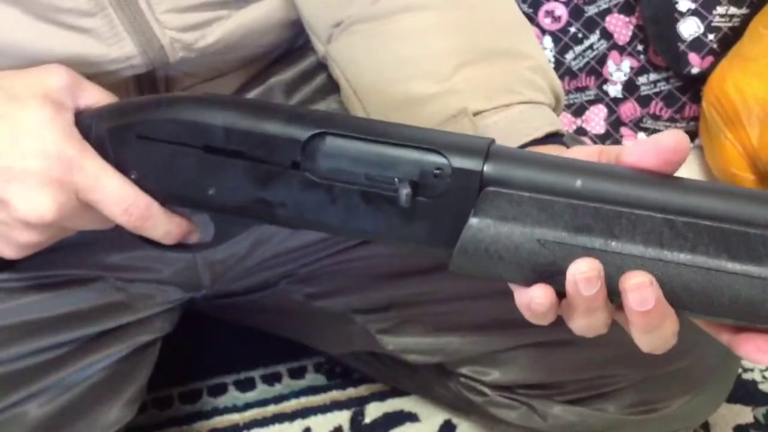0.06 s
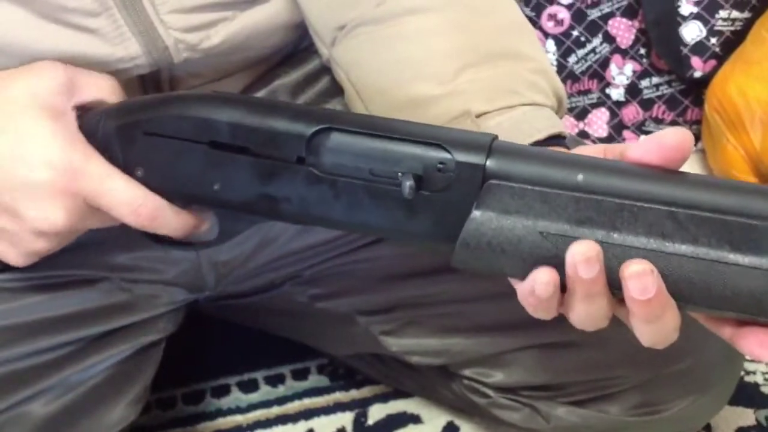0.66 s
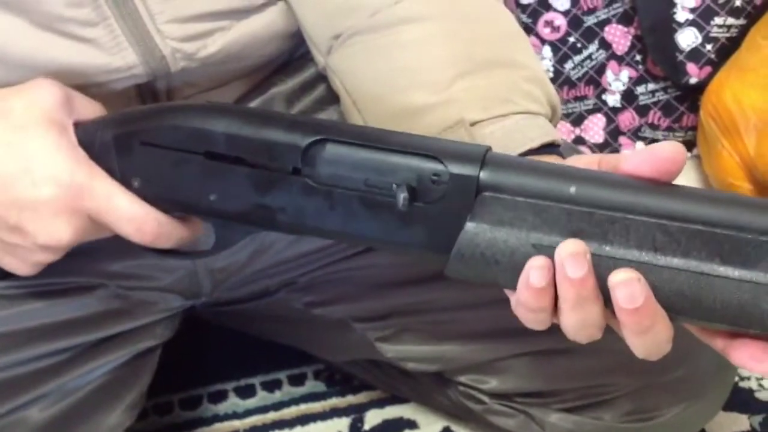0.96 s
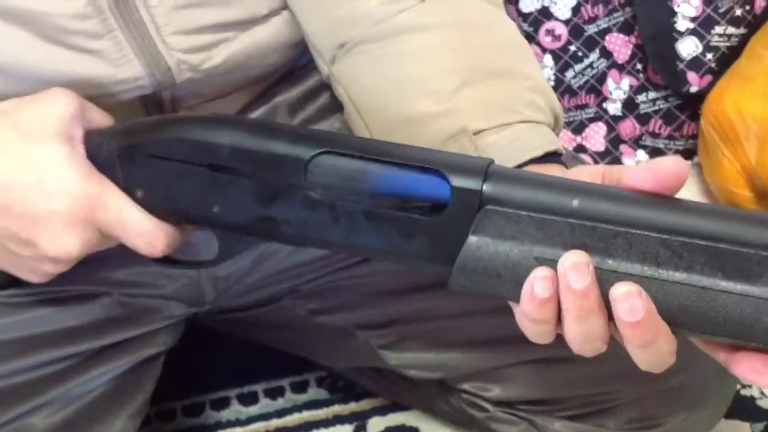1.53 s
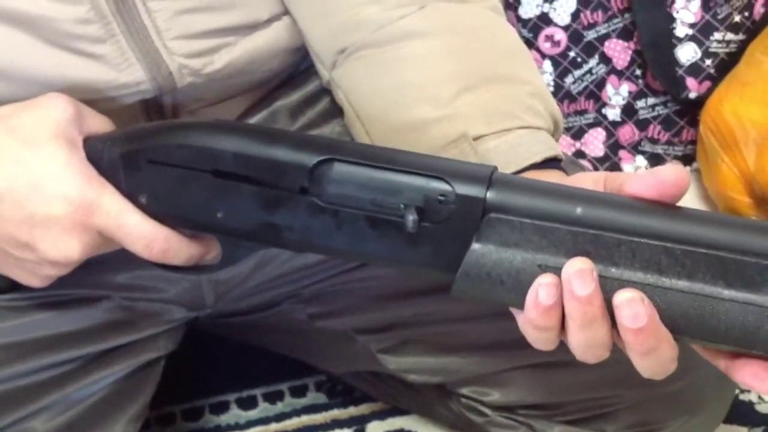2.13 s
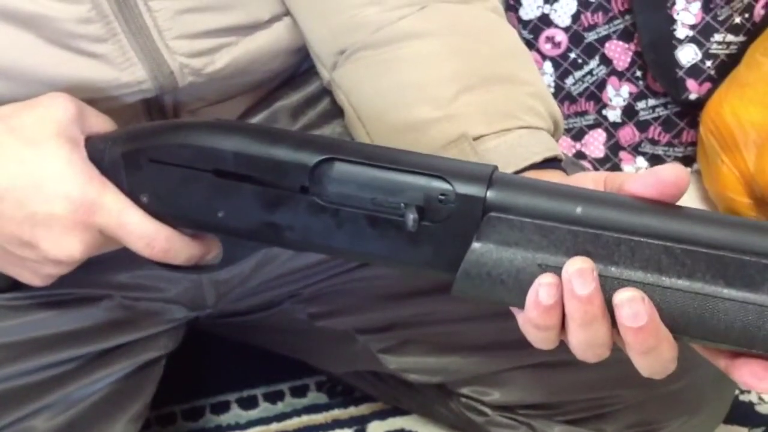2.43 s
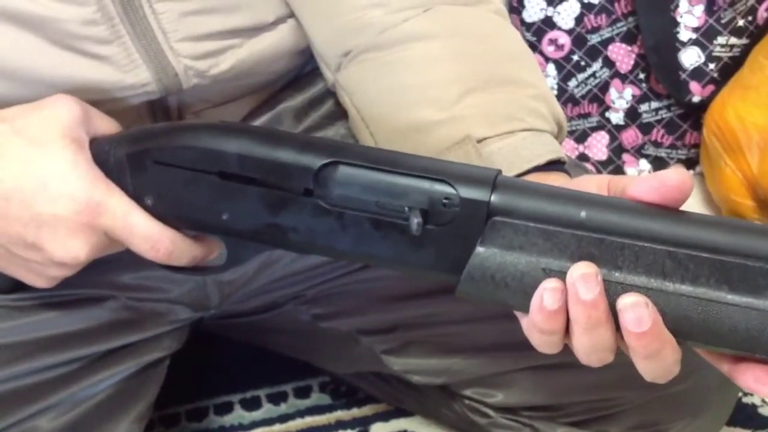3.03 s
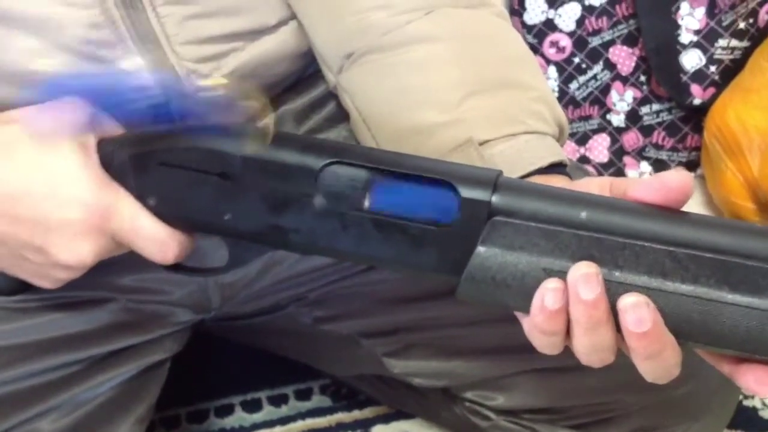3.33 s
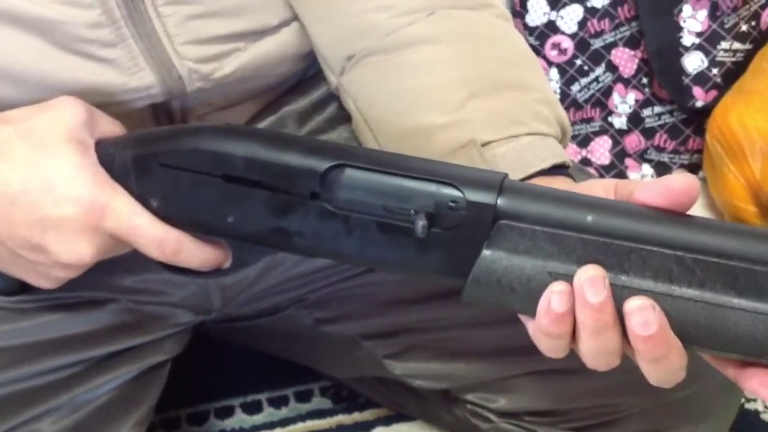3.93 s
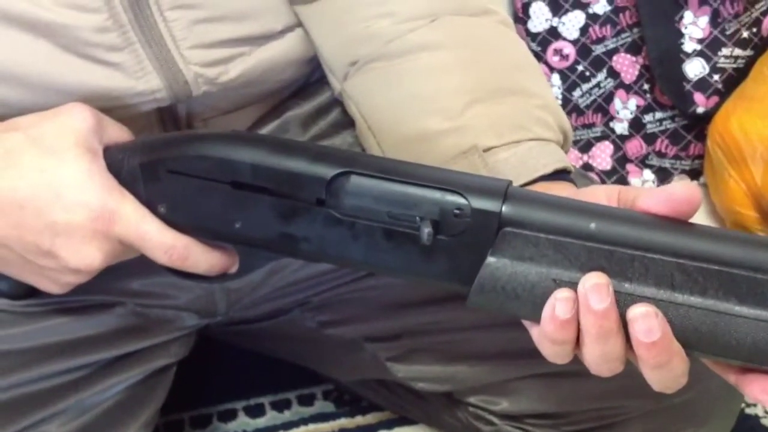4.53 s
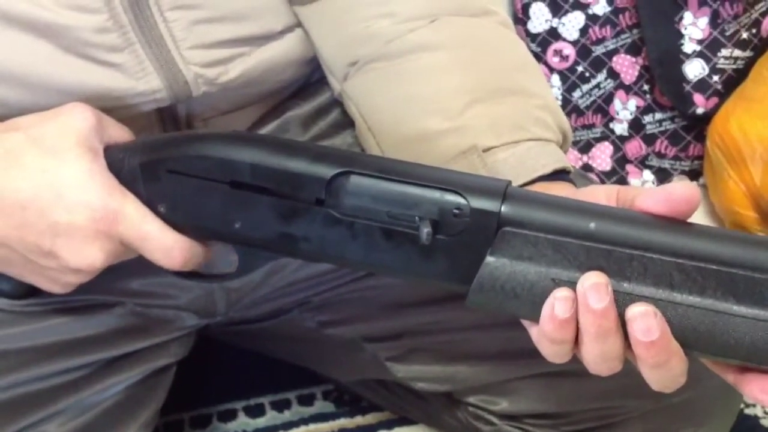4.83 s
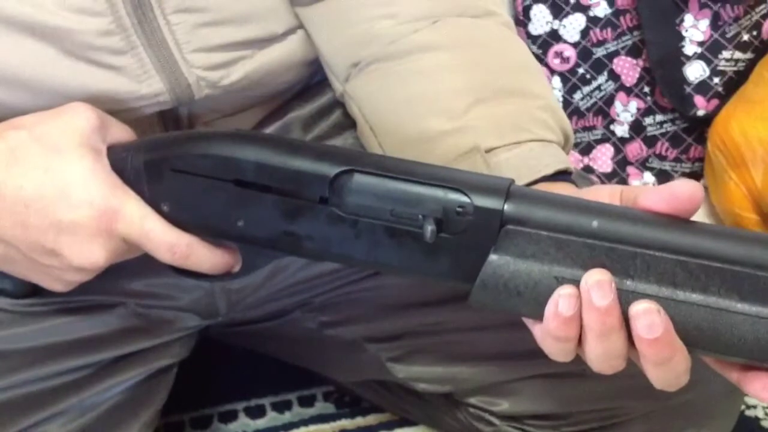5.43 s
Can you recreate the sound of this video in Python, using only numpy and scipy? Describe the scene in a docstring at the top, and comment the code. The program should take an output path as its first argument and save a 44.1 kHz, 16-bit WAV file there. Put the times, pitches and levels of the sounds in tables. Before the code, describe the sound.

A gas-powered toy shotgun fires three sharp, clacking shots indoors, with ejected plastic shells clattering and clinking in between.

```python
"""A faint rush and hiss in a small, live room, then hands shifting on a stock close to the microphone.
A gas-powered toy shotgun fires three times: hammer snap, gas blast and the clack of the cycling bolt,
loud enough to overload the input. Further off, two ejected plastic shells with brass bases clatter
about, the first also rolling and clinking on metal. A spring sings in the gun after the second shot,
and the third shell drops on something soft."""
import sys
import numpy as np
from scipy import signal
from scipy.fft import rfft, irfft, next_fast_len
from scipy.io import wavfile

SR = 44100
rng = np.random.default_rng(int(sys.argv[2]) if len(sys.argv) > 2 else 0)


def wav_out(sig):
    """Save sig, one row per channel (or a flat mono array), as 16-bit PCM at SR to the path in sys.argv[1]."""
    wavfile.write(sys.argv[1], SR, np.round(np.clip(np.atleast_2d(sig).T, -1, 1) * 32767).astype(np.int16))


N = 250047
AGE = np.arange(SR // 2) / SR  # seconds since a blow

# The hammer falls. Each row: start in seconds, blast trim in dB, cycle length relative to normal,
# bolt trim in dB, trim of the bolt's low thud in dB.
SHOTS = [(1.446, 0, 1.0, 0, -11.5), (3.2605, 0.5, 0.97, 0, 11), (4.8845, 0.5, 0.97, 0, -5.5)]
# The sharp (snap) and dull (body) colours of a blow on the gun, its metal action or a shell.
# Each row: frequency in Hz, relative spectral level in dB.
GUN_SNAP = [(100, -46.5), (1000, -21), (2200, -18), (3500, -16.5), (4700, -5.5), (5700, 1), (6900, -7),
            (8500, -3.5), (10500, -15.5), (12500, -22.5), (15000, -36)]
CLACK_BODY = [(40, -40), (100, -25), (300, -11), (900, -6), (1400, -7), (2200, 1), (3800, 1), (6000, -10),
              (15000, -42)]
SHELL_SNAP = [(100, -50.5), (1000, -26), (2200, -18), (3600, -13), (4700, -5), (5700, 2), (7000, -7),
              (8500, -7), (10500, -16.5), (12500, -24), (15000, -36)]
SHELL_BODY = [(40, -38.5), (90, -23), (170, 0), (300, -1), (430, 2), (700, -2), (1000, -3.5), (1400, -3.5),
              (2000, -2.5), (2800, -8), (4000, -14), (6000, -30), (15000, -47)]


def amp(db):
    """Decibels to gain."""
    return 10 ** (np.asarray(db) / 20)


def unit(x):
    """Scale to rms 1."""
    return x / np.sqrt(np.mean(x ** 2) + 1e-20)


def along(points, hz):
    """Read (Hz, value) points on a log frequency axis."""
    freqs, values = np.transpose(points)
    return np.interp(np.log(hz + 1), np.log(freqs + 1), values)


def fade(t60, t=AGE):
    """Exponential decay, 60 dB down after t60 seconds."""
    return np.exp(-np.log(1000) * t / np.maximum(t60, 1e-4))


def add(track, s, sound):
    """Mix a sound into the track at s seconds."""
    part = track[max(round(s * SR), 0):][:len(sound)]
    part += sound[:len(part)]


def coloured(x, spectrum):
    """Give x a spectrum through a causal filter of unit power gain."""
    size = 2 * next_fast_len(len(x))
    gain = unit(amp(along(spectrum, np.fft.rfftfreq(size, 1 / SR))))
    cepstrum = irfft(np.log(gain + 1e-6))
    cepstrum[1:size // 2] *= 2  # minimum phase: nothing sounds ahead of the blow
    cepstrum[size // 2 + 1:] = 0
    return irfft(rfft(x, size) * np.exp(rfft(cepstrum)))[:len(x)]


def burst(spectrum, rise, t60):
    """A short rattle of pressure in a given colour; rise and t60 are in seconds."""
    attack = 1 - np.exp(-AGE / max(rise, 1e-5))
    return coloured(rng.standard_normal(len(AGE)) * attack * fade(t60), spectrum)


def ring(modes, scatter_db):
    """Decaying modes, struck at new strengths by every blow."""
    return sum(amp(db + scatter_db * rng.standard_normal()) * np.sin(2 * np.pi * hz * AGE) * fade(t60)
               for hz, db, t60 in modes)


def in_room(x, wet_db, build):
    """The direct sound and the room's echoes, which swell over build seconds and die by band."""
    # The room's decay. Each row: frequency in Hz, t60 in seconds.
    room = [(100, 0.18), (400, 0.23), (2000, 0.25), (6000, 0.24), (10000, 0.23), (15000, 0.18)]
    hz, t, bands = signal.stft(rng.standard_normal(len(AGE)), SR, nperseg=256)
    bands = bands * fade(along(room, hz)[:, None], t)
    tail = signal.istft(bands, SR, nperseg=256)[1][:len(AGE)]
    tail *= 1 - np.exp(-(AGE / build) ** 2)
    return x + amp(wet_db) * signal.fftconvolve(x, tail / np.linalg.norm(tail))[:len(x)]


def room_tone(dip_db=11, recovery_s=0.91):
    """A low rush and a thin hiss drift in level; both dip at each shot and creep back."""
    # Drift in the two long pauses. Each row: time in seconds, relative rush and hiss levels in dB.
    drift = [
        [(0.0, -72.5, -71), (0.922, -72.5, -61.5), (1.37, -71.5, -62.5)],
        [(4.15, -59.5, -65), (4.34, -58.5, -66), (4.84, -55, -61)],
    ]
    # Colours of rush and hiss. Each row: frequency in Hz, relative spectral level in dB.
    rush = [(25, -42.5), (60, -30.5), (100, -14.5), (135, -9.5), (175, 3.5), (270, -6), (430, 3),
            (650, -5.5), (950, -9.5), (1500, -20.5), (3000, -26), (8000, -59)]
    hiss = [(40, -26), (110, -1.5), (230, 5.5), (450, -6), (800, -2), (1600, -7), (4000, -6), (5600, 1),
            (8400, -7), (11000, -11.5), (15000, -18.5)]
    t = np.arange(N) / SR
    times, rush_db, hiss_db = np.vstack(drift).T
    dip = dip_db * sum(np.interp(t, [s, s + recovery_s], [1, 0], left=0) for s, *_ in SHOTS)
    return sum(amp(np.interp(t, times, db) - dip) * unit(coloured(rng.standard_normal(N), spectrum))
               for db, spectrum in [(rush_db + 0.5, rush), (hiss_db + 2.5, hiss)])


def grip():
    """Hands and sleeves tick and scuff faintly on the gun ahead of the first shot."""
    # Each row: start in seconds, relative level in dB, body against snap in dB, rise and t60 in seconds.
    touches = [(0.6623, -26.5, -12, .0005, 0.011), (0.6835, -33, -6, .0005, 0.011),
               (0.7338, -34, -12, .0005, 0.012), (1.106, -40, -28, .03, 0.32), (1.382, -45, 1, 0.011, 0.19)]
    out = np.zeros(N)
    for s, db, body_db, rise, t60 in touches:
        scuff = burst(GUN_SNAP, rise, t60) + amp(body_db) * burst(CLACK_BODY, rise, t60)
        add(out, s, amp(db - 7.5) * in_room(scuff, wet_db=0, build=0.006))
    return out


def push(width_s):
    """One low swing of pressure as gas or a heavy part moves."""
    u = AGE / width_s
    return -u * (2 - u) * np.exp(-u) * 2


def shots(push_delay_s=0.004, body_life=0.81):
    """The gun fires close to the microphone; each stage is a sharp snap, a dull body and a low push."""
    # Trigger, hammer on the valve, gas blast, bolt at its rear stop, venting. Each row: delay in
    # seconds, relative levels of the stage, its body and its push in dB, rise and t60 in seconds.
    stages = [(-.012, -30, 8, -27, .001, 0.034), (.0003, 3, -9.5, -16.5, 0.0039, 0.074),
              (0.015, 6, -4, -14, .001, 0.092), (0.0497, 6, -20, -17, .002, .026),
              (.064, -3.5, -25.5, -40.5, 0.0032, .08)]
    # The dull part of a shot. Each row: frequency in Hz, relative spectral level in dB.
    gun_body = [(25, -7.5), (70, -11.5), (120, -2), (180, 2), (290, 0), (450, 2), (700, -7), (1050, 0.5),
                (1500, -10), (2600, -1), (5000, -26.5), (15000, -44)]
    out = np.zeros(N)
    for s, db, stretch, *_ in SHOTS:
        for delay, stage_db, body_db, push_db, rise, t60 in stages:
            start, gain = s + stretch * delay, amp(db + stage_db - 4)
            snap = in_room(burst(GUN_SNAP, rise, t60), wet_db=-9.5, build=0.0075)
            # at this distance the low parts carry little of the room
            body = in_room(burst(gun_body, rise, t60 * body_life), wet_db=-15.5, build=0.0092)
            add(out, start, gain * (snap + amp(body_db - 6) * body))
            add(out, start + push_delay_s, gain * amp(push_db - 6.5) * push(width_s=0.00073))
    return out


def action():
    """Metal parts clack and ring as the bolt runs forward and chambers a shell, at that shot's pace."""
    # Bolt, shell lifter and latch. Each row: delay in seconds, relative levels of the clack,
    # its body and its push in dB.
    clacks = [(0.1011, 2.5, -32.5, -46.5), (0.1226, -3, -34, -46), (0.1336, -1.5, -18.5, -51.5),
              (0.1405, 4.5, -20.5, -46), (.156, -7, -17, -39), (.1894, -14.5, -23, -52),
              (0.2079, -4.5, -29, -64), (0.2179, -16.5, -22, -59.5)]
    # Modes of the steel parts. Each row: frequency in Hz, relative level in dB, t60 in seconds.
    steel = [(5400, -4, 0.2), (5453, -4, 0.2), (5647, -3, 0.19), (6083, -7, 0.22), (6504, -8, 0.22),
             (7000, -7.5, 0.22), (7900, -7, 0.22), (8200, -3, 0.18), (8500, 0, 0.18), (10640, -12.5, 0.11)]
    out = np.zeros(N)
    for s, _, stretch, bolt_db, thud_db in SHOTS:
        for delay, db, body_db, push_db in clacks:
            snap = burst(GUN_SNAP, rise=0.0013, t60=0.017)
            body = amp(body_db + 2) * burst(CLACK_BODY, rise=0.00069, t60=0.039)
            clack = in_room(snap + body, wet_db=-7, build=0.0017)
            thud = amp(push_db + thud_db + 11.5) * push(width_s=0.00054)
            ringing = amp(-42) * ring(steel, scatter_db=4.5)
            add(out, s + stretch * delay, amp(bolt_db + db - 2) * (clack + thud + ringing))
    return out


def shell_bounces(t60=0.016, hollow_db=6):
    """Plastic hulls land on one end, then the other, so far off that the echo outweighs the knock."""
    # Each row: start in seconds, relative levels of the knock and its body in dB, body pitch in Hz,
    # seconds until the other end lands, that end against the first in dB.
    landings = [(1.8886, -13.5, -7.5, 1994, .019, -8.5), (1.921, -1.5, -26, 1996, .010, -1),
                (1.9415, 3, -11, 1210, .008, -1), (2.148, -19, -17, 2000, .006, -7),
                (2.2313, -12, -29, 2200, .0045, -1), (2.2875, -12, -10.5, 1500, .006, 3.5),
                (2.3255, -10, -13.5, 410, .013, -0.5), (2.4053, -15, 4.5, 1040, .0125, -1.5),
                (2.4835, -15, -7.5, 1800, .02, -0.5), (2.5247, -14.5, -9.5, 1800, .007, 3.5),
                (2.5961, -26.5, 5, 1400, .004, -10), (2.7134, -9.5, -9, 386, .016, -8.5),
                (2.7798, -17.5, -34, 1600, .012, -6.5), (2.8582, -13.5, -18, 1200, .011, -4.5),
                (2.9123, -16.5, -18, 402, .0134, 7), (3.8478, -21.5, -10.5, 249, .008, 5),
                (3.9604, -22.5, -14.5, 1950, .0105, 0.5), (3.9858, -19.5, -20.5, 1960, .009, -4.5)]
    out = np.zeros(N)
    for s, db, body_db, hz, tip_over, other_end_db in landings:
        # whatever is struck lifts a broad band of the body around its own pitch
        colour = [(f, level + hollow_db * np.exp(-np.log2(f / hz) ** 2)) for f, level in SHELL_BODY]
        for start, end_db in [(s, db), (s + tip_over, db + other_end_db)]:
            snap = burst(SHELL_SNAP, rise=0.00013, t60=t60)
            body = amp(body_db + 1.5) * burst(colour, rise=0.00034, t60=t60)
            add(out, start, amp(end_db - 6) * in_room(snap + body, wet_db=3.5, build=0.0014))
    return out


def shell_roll(bumps_per_s=900, spread_db=3, attack_s=0.017, release_t60=0.19):
    """Between bounces a hull's rim rolls over tiny bumps, which the room blurs into a scrape."""
    # Each row: start and length in seconds, relative level in dB.
    rolls = [(2.091, .1, -43.5), (2.307, .05, -34.5), (2.441, 0.14, -34), (2.651, .14, -35.5),
             (2.864, .08, -36)]
    t = np.arange(N) / SR
    level = np.zeros(N)
    for s, length, db in rolls:
        attack = np.clip((t - s) / attack_s, 0, 1)
        level += amp(db) * attack * fade(release_t60, np.maximum(t - s - length, 0))
    hits = rng.random(N) < bumps_per_s / SR
    strengths = rng.standard_normal(N) * amp(spread_db * rng.standard_normal(N))
    bumps = unit(hits * strengths) * level
    scrape = coloured(bumps, SHELL_SNAP) + amp(-12) * coloured(bumps, SHELL_BODY)
    return amp(-2) * in_room(scrape, wet_db=-2, build=0.0022)


def brass_clinks(rebound_s=0.0065, rebound_db=-6):
    """A shell's brass base strikes metal with a quick double tick and rings on."""
    # Each row: start in seconds, relative levels of the strike and its ring in dB.
    strikes = [(2.9914, -5, -13), (3.0287, 1, -13), (3.0456, 0, -12.5)]
    # Modes of the base. Each row: frequency in Hz, relative level in dB, t60 in seconds.
    brass = [(431, -33.5, 0.9), (1200, -23, 0.25), (2015, -24, .26), (2770, -22, .18), (4124, -9, .2),
             (4690, -9, .21), (4860, -4, .17), (5426, -6, 0.19), (5803, -3, .12), (5927, -1.5, 0.2),
             (6928, -11, .21), (8236, -8, 0.11), (8742, -10, .14), (9884, -15, .15), (10900, -21, .14)]
    out = np.zeros(N)
    for s, db, ring_db in strikes:
        add(out, s, amp(db + ring_db - 4) * ring(brass, scatter_db=3.5) * (1 - fade(0.004)))
        for delay, drop_db in [(0, 0), (rebound_s, rebound_db)]:
            snap = burst(SHELL_SNAP, rise=0.0003, t60=0.02)
            body = amp(-11) * burst(CLACK_BODY, rise=0.00027, t60=0.022)
            add(out, s + delay, amp(db + drop_db - 5.5) * in_room(snap + body, wet_db=-3, build=0.0011))
    return out


def spring(start_s=3.467, t60=1.74, min_beat_hz=13, linewidth_hz=110):
    """A blow sets a spring singing in the gun; close pairs of modes flutter and wander as they fade."""
    # Each row: frequency in Hz, relative level in dB.
    modes = [(4630, -79.5), (5276, -77), (6035, -69), (7208, -76.5), (8269, -73.5), (9324, -73.5),
             (9916, -84.5), (10637, -77)]
    out, t = np.zeros(N), np.arange(SR) / SR
    for hz, db in modes:
        partner_hz = hz + min_beat_hz * (1 + rng.random())
        wander = np.cumsum(rng.standard_normal(SR)) * np.sqrt(2 * np.pi * linewidth_hz / SR)
        pair = np.sin(2 * np.pi * hz * t + wander) + 0.77 * np.sin(2 * np.pi * partner_hz * t - wander)
        add(out, start_s, amp(db + 16) * fade(t60, t) * pair)
    return out


def soft_landing(start_s=5.281, rest_hz=145, sink_hz=190, sink_s=0.0054, swell_s=0.00626):
    """The last shell ticks and thumps on padding; the pitch sinks as the padding gives way."""
    # Modes of the padding. Each row: frequency in Hz, relative level in dB, t60 in seconds.
    cushion = [(140, -11, 0.24), (623, -10, 0.019), (1020, 0.5, 0.012)]
    # Each point: frequency in Hz, relative spectral level in dB.
    tick_colour = [(200, -3.5), (1000, -5), (2500, -13), (3700, -21),
                   (5300, 1.5), (6600, 1), (8000, -18), (15000, -37.5)]
    hz = rest_hz + sink_hz * np.exp(-AGE / sink_s)
    swell = AGE / swell_s * np.exp(1 - AGE / swell_s)
    thump = amp(1) * swell * np.sin(2 * np.pi * np.cumsum(hz) / SR)
    tick = amp(5) * burst(tick_colour, rise=0.0002, t60=0.0144)
    landing = thump + tick + ring(cushion, scatter_db=1)
    out = np.zeros(N)
    add(out, start_s, amp(-29) * in_room(landing, wet_db=-12, build=0.0078))
    return out


def scene():
    """One microphone: the gun close by, the shells further off, the room all round."""
    gun = shots() + action() + spring() + grip()
    return (gun + shell_bounces() + shell_roll() + brass_clinks() + soft_landing() + room_tone())[None]


def record(dry, ceiling=0.93, hardness=5, top_hz=15250):
    """The recorder's input saturates on the shots and keeps nothing above its band limit."""
    clipped = dry / (1 + np.abs(dry / ceiling) ** hardness) ** (1 / hardness)
    size = next_fast_len(N + SR // 2)
    passband = np.fft.rfftfreq(size, 1 / SR) < top_hz
    return irfft(rfft(clipped, size) * passband, size)[..., :N]


dry = scene()
out = record(dry)
wav_out(out)
```